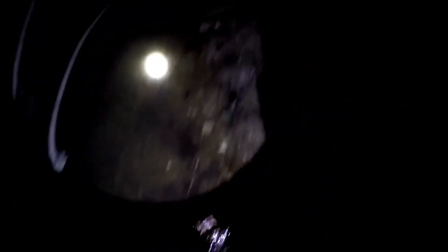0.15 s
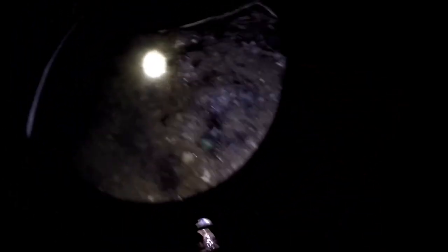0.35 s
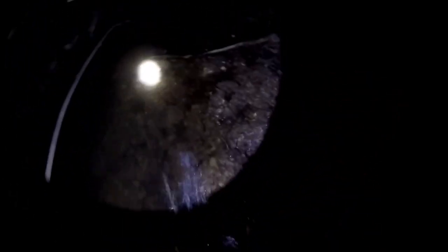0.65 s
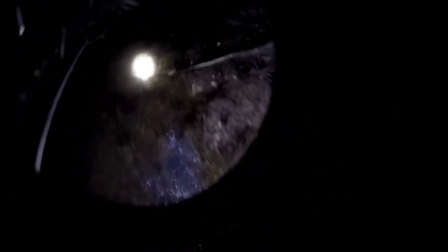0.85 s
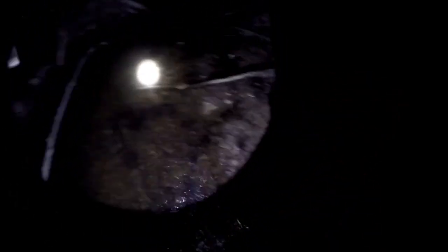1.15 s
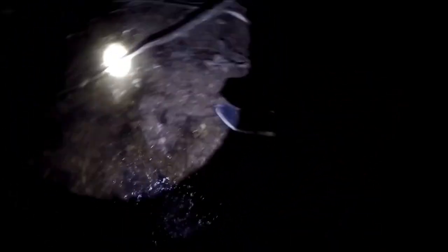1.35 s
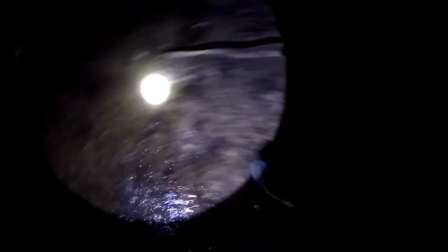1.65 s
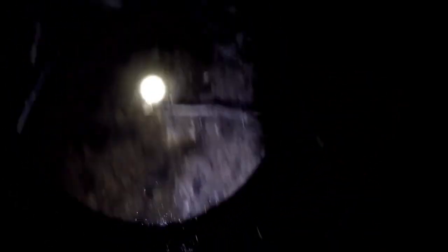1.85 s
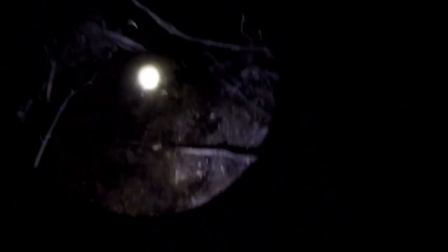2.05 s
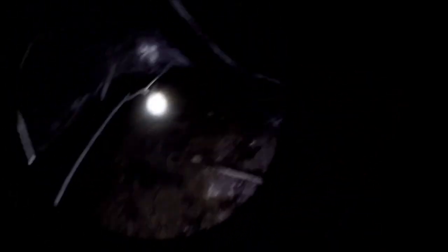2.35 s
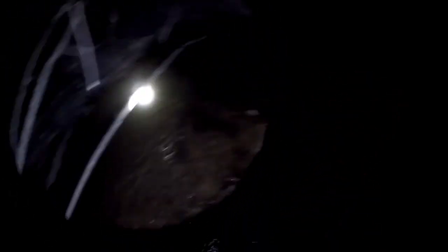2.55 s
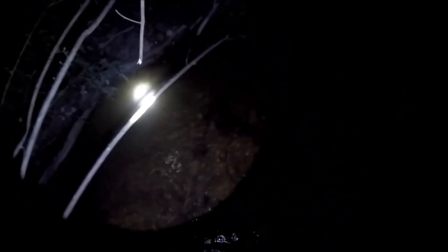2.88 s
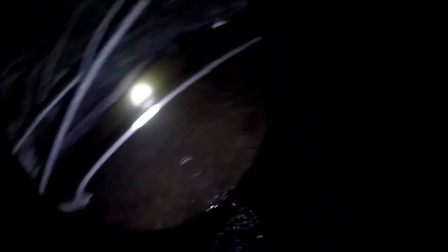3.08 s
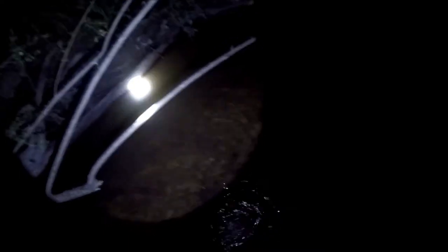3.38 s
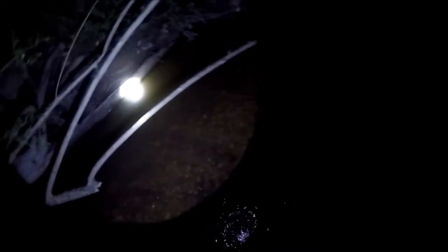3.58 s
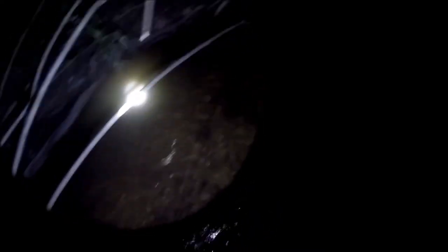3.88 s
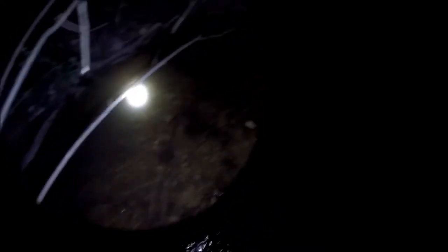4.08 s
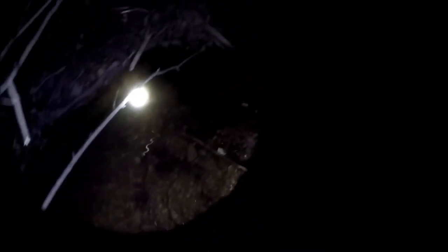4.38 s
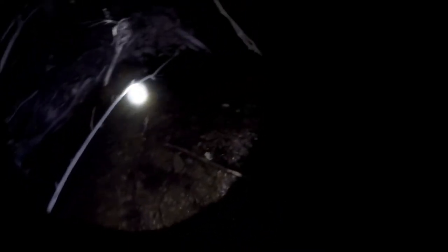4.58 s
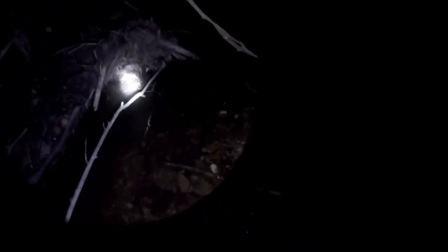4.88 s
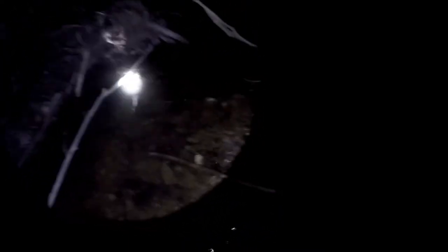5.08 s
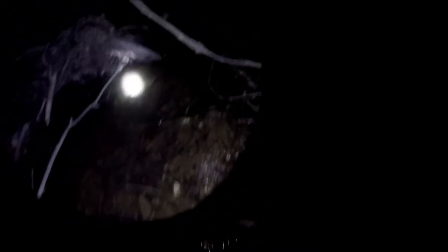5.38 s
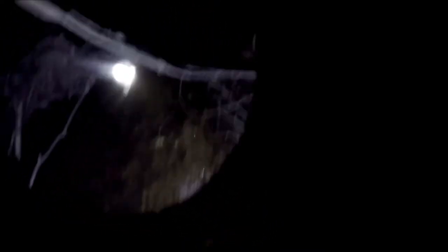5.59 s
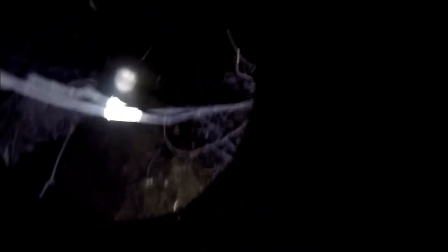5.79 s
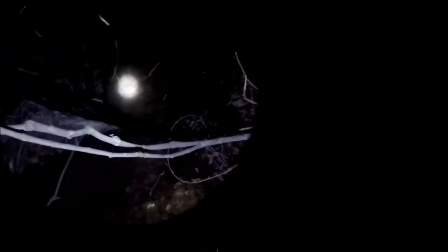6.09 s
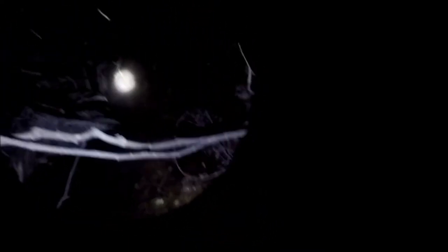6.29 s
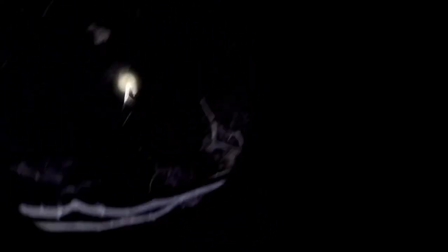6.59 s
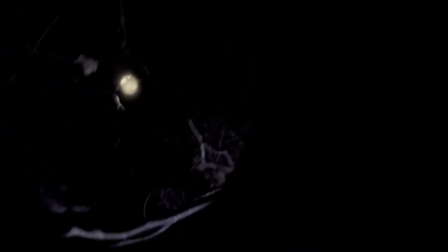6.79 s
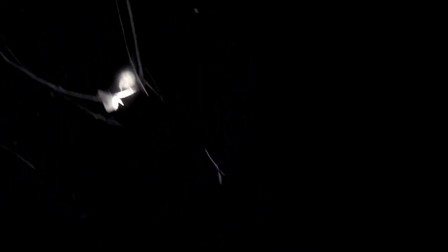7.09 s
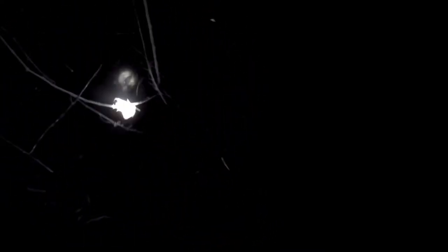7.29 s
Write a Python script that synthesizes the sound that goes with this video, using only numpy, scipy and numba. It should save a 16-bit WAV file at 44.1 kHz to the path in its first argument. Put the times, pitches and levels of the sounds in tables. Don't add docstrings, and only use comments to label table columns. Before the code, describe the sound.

Legs wade slowly through a shallow creek at night, dull splashes and glugs against a closed microphone housing while crickets trill steadily.

```python
import sys
import numpy as np
from scipy import signal
from scipy.fft import rfft, irfft, next_fast_len
from scipy.io import wavfile
from scipy.ndimage import uniform_filter1d, map_coordinates
from numba import njit

SR = 44100
rng = np.random.default_rng(int(sys.argv[2]) if len(sys.argv) > 2 else 0)


def decibels_to_gain(level_db):
    exponent = np.asarray(level_db, float) / 20
    return 10 ** exponent


def to_wav(s):
    ch = np.atleast_2d(s).T
    pcm = np.round(np.clip(ch, -1, 1) * 32767)
    wavfile.write(sys.argv[1], SR, pcm.astype(np.int16))


N = 328211


def level(x, db):
    return x * decibels_to_gain(db) / np.sqrt(np.mean(x ** 2))


def curve(table):
    s, *columns = np.transpose(table)
    return [np.interp(np.arange(N) / SR, s, c) for c in columns]


def ring(x, hz, width_hz):
    return signal.lfilter(*signal.iirpeak(hz, hz / width_hz, fs=SR), x)


def band_noise(hz, width_hz):
    return ring(ring(rng.standard_normal(N), hz, width_hz), hz, width_hz)


def coloured(points):
    size = next_fast_len(N)
    hz, db = np.transpose(points)
    log_hz = np.log(np.arange(size // 2 + 1) * SR / size + 1)
    gain = decibels_to_gain(np.interp(log_hz, np.log(hz), db, -90, -90))
    return level(irfft(rfft(rng.standard_normal(size)) * gain, size)[:N], 0)


def walk(rate_hz):
    k = int(SR / rate_hz)
    held = np.repeat(rng.standard_normal(1000), k)[:N]
    return 1.3 * uniform_filter1d(uniform_filter1d(held, k), k)


def even(x, span_s, slack):
    return level(x / (uniform_filter1d(np.abs(x), int(span_s * SR)) + slack), 0)


def swells(start_s, hold_s, db, rise_db_s, fall_db_s, floor_db=-120):
    t = np.arange(0, N / SR + .002, .001)
    since = t - np.reshape(start_s, (-1, 1))
    before_db = rise_db_s * np.maximum(-since, 0)
    after_db = fall_db_s * np.maximum(since - np.reshape(hold_s, (-1, 1)), 0)
    event_db = np.reshape(db, (-1, 1)) - (before_db + after_db)
    power = np.sum(decibels_to_gain(event_db) ** 2, axis=0) + decibels_to_gain(floor_db) ** 2
    return np.interp(np.arange(N) / SR, t, np.sqrt(power))


@njit
def grains(length, start, hz, t60, glide, size, swell):
    y = np.zeros(length)
    for k in range(len(start)):
        z, w, closed = size[k] + 0j, 2 * np.pi * hz[k] / SR, 1.
        fade, climb = np.exp(-np.log(1000) / (t60[k] * SR)), glide ** (1 / SR)
        opening = np.exp(-1 / (swell * t60[k] * SR))
        for i in range(start[k], min(length, start[k] + int(t60[k] * SR))):
            z *= fade * np.exp(1j * w)
            w *= climb
            closed *= opening
            y[i] += z.imag * (1 - closed)
    return y


def swarm(low_hz, high_hz, cycles, spread_db, glide, count):
    when, pitch, size = rng.random((count, 3)).T
    hz = low_hz * (high_hz / low_hz) ** pitch
    size = decibels_to_gain(-spread_db * np.log(size + 0.03)) * np.sqrt(hz)
    return level(grains(N, (when * N).astype(np.int64), hz, cycles / hz, glide, size, 0.031), 0)


def rings(rows, swell):
    s, db, hz, t60_s = np.transpose(rows)
    return grains(N, (s * SR).astype(np.int64), hz, t60_s, 4., decibels_to_gain(db), swell)


def housing(x, push, modes, leak_db):
    def shell(v):
        return sum(decibels_to_gain(db) * ring(v, hz, width_hz) for hz, width_hz, db in modes) + decibels_to_gain(leak_db) * v
    return shell(x * push) / np.std(shell(x))


# start_s, length_s, level_db, bright_minus_dull_db
SPLASHES = [(0.145, 0.011, -60.5, 11), (0.422, 0.09, -55, 3.5), (0.81, 0.049, -62, 19),
            (0.891, 0.093, -55, 5.5), (1.035, 0.043, -52, -2.5), (1.273, 0.041, -50.5, 4),
            (1.333, 0.05, -41, 3), (1.394, 0.028, -48, -6), (1.43, 0.13, -50.5, -1),
            (1.595, 0.033, -49.5, 0), (1.729, 0.033, -43.5, -2), (1.798, 0.048, -53, -4),
            (1.921, 0.029, -61.5, -11), (1.975, 0.056, -54.5, -3), (2.308, 0.017, -50, -0.5),
            (2.608, 0.0089, -49, -4), (2.852, 0.031, -51, -2.5), (3.075, 0.087, -46.5, -1.5),
            (3.322, 0.015, -51, -12.5), (3.606, 0.039, -46.5, 1), (3.782, 0.026, -48, -4),
            (3.819, 0.02, -48.5, -14), (3.867, 0.025, -59.5, -13), (3.96, 0.0068, -47, -6),
            (3.981, 0.032, -50, 3), (4.129, 0.014, -47, -8), (4.921, 0.06, -55.5, -2.5),
            (6.075, 0.043, -45.5, 1), (6.194, 0.044, -48, -4), (6.234, 0.027, -53, -7),
            (6.597, 0.05, -54.5, -4.5)]
# start_s, length_s, level_db
SLOSHES = [(0.63, 0.024, -54), (1.201, 0.023, -56), (1.65, 0.025, -54), (2.332, 0.057, -57),
           (2.498, 0.032, -59), (2.547, 0.044, -59), (2.669, 0.05, -59), (2.793, 0.021, -60.5),
           (2.947, .03, -63), (4.3, 0.11, -67), (5.212, 0.03, -65), (3.002, 0.031, -58.5),
           (3.242, 0.11, -60), (3.362, 0.034, -56), (3.41, 0.017, -53.5), (3.64, 0.053, -58),
           (3.747, 0.027, -51.5), (4.064, 0.062, -55.5), (4.768, .071, -64), (5.116, 0.034, -58.5),
           (5.502, 0.016, -58), (5.561, 0.06, -59), (5.671, 0.076, -60), (5.785, 0.025, -64),
           (4.69, 0.038, -67), (5.903, 0.038, -59.5), (5.974, 0.065, -58.5), (6.177, .025, -59),
           (6.368, 0.053, -59), (6.58, 0.025, -58), (6.662, 0.058, -59), (6.803, 0.089, -56.5),
           (6.91, 0.029, -58.5), (7.024, 0.12, -60.5), (7.363, 0.097, -62)]
SLOSH_TILT_DB = -2.5
# time_s, level_db
STIR = [(0.0, -65.5), (0.6, -57.5), (0.91, -59.5), (1.04, -63.5), (1.43, -55), (1.86, -58.5), (1.99, -63),
        (3.25, -62), (3.4, -68), (3.7, -54), (4.0, -66), (4.55, -67), (5.01, -61), (5.43, -64.5),
        (6.62, -60), (6.75, -68), (6.95, -58.5), (7.44, -67)]
# pitch_hz, width_hz, gain_db
DULL_MODES = [(695, 690, -7), (816, 130, -20), (1020, 520, -6.5)]
# pitch_hz, width_hz, gain_db
BRIGHT_MODES = [(1440, 420, -4.5), (1912, 160, -0.5), (2420, 87, -19), (2886, 300, -10.5)]
# freq_hz, density_db
THUMP = [(55, -27), (80, 5.5), (130, -3), (180, -15.5), (240, -25.5), (400, -37)]


def wading():
    t, dull, bright = np.arange(N) / SR, np.zeros(N), np.zeros(N)
    for s, length_s, db, tilt_db in SPLASHES + [row + (SLOSH_TILT_DB,) for row in SLOSHES]:
        span = slice(max(int((s - .02) * SR), 0), int((s + length_s + .12) * SR))
        since = t[span] - s
        onset = np.clip(since / 0.0077 + 0.31, 0, 1)
        shape = onset * np.exp(-np.maximum(since - length_s + 0.0033, 0) / 0.0068)
        dull[span] += (decibels_to_gain(db - tilt_db / 2) * shape) ** 2
        bright[span] += (decibels_to_gain(db + tilt_db / 2) * shape) ** 2
    flicker_db = 2.2 * walk(30)
    dull, bright = (v * decibels_to_gain(1.07 * walk(70)) ** 2 for v in (dull, bright))
    stir = decibels_to_gain(curve(STIR)[0] + flicker_db) ** 2
    low_bubbles = swarm(500, 1150, 11., 3.6, 30., count=14000)
    low = housing(low_bubbles, np.sqrt(dull + .6 * stir), DULL_MODES, leak_db=-17)
    high_bubbles = swarm(1100, 3000, 14., 3.8, 30., count=30000)
    high = housing(high_bubbles, np.sqrt(bright + .6 * stir), BRIGHT_MODES, leak_db=-15)
    knock = coloured(THUMP) * uniform_filter1d(np.sqrt(dull), int(0.021 * SR))
    spray = decibels_to_gain(-14.5) * np.sqrt(bright) * swarm(3100, 4600, 9.9, 3.6, 1., count=20000)
    return spray + decibels_to_gain(-3.0) * low + decibels_to_gain(-2.0) * high + decibels_to_gain(2.5) * knock


# start_s, peak_db, pitch_hz
GLUGS = [(1.061, -35.5, 790), (1.722, -40, 1020), (1.735, -34, 750), (1.91, -39.5, 530),
         (2.314, -32.5, 665), (2.599, -36, 1100), (3.086, -26, 745), (3.104, -25.5, 770),
         (3.146, -28.5, 767), (3.591, -45, 660), (3.981, -34, 900), (3.995, -28.5, 715), (4.135, -34, 1020),
         (4.935, -39, 1020), (6.06, -47, 750), (6.077, -31, 757), (6.087, -26.5, 810), (6.627, -33.5, 850),
         (6.774, -46, 800), (1.291, -45, 1012), (1.341, -35, 1050), (1.352, -31, 1000), (1.366, -30, 689),
         (1.513, -45, 882), (1.609, -40, 645), (1.744, -34, 710), (3.161, -36, 740), (3.616, -32, 689),
         (3.626, -39, 700), (3.637, -38, 660), (3.828, -36, 775), (4.947, -38, 1033), (6.098, -27, 1000),
         (6.235, -40, 796), (6.249, -32, 680)]
# start_s, peak_db, pitch_hz
PLINKS = [(1.0423, -35, 1440), (1.3444, -24.5, 1990), (1.603, -42, 1420), (1.7362, -33, 1980),
          (1.75, -40, 1400), (2.3584, -39, 1890), (3.0803, -44, 1900), (3.13, -29, 1490),
          (3.325, -42, 1310), (3.6056, -37, 1280), (3.9601, -48, 1500), (3.9801, -36, 1467),
          (3.996, -32, 1495), (4.086, -39, 1220), (6.076, -28.5, 1440), (6.2153, -31, 1230),
          (6.526, -44, 1320), (6.6263, -39.5, 1930), (1.667, -40, 1980), (.758, -40, 4200),
          (6.9882, -53, 1400), (.495, -38, 1450), (.853, -38, 3983), (.89, -44, 2810), (.905, -41, 3897),
          (.942, -39, 1970), (1.049, -37, 1940), (1.06, -40, 1850), (1.303, -42, 1356), (1.334, -41, 1370),
          (1.354, -45, 4608), (1.363, -32, 2720), (1.369, -44, 4565), (1.371, -37, 3360),
          (1.393, -42, 1470), (1.46, -34, 2010), (1.472, -37, 2810), (1.522, -41, 2024), (1.613, -36, 1981),
          (3.091, -35, 1860), (3.107, -35, 1860), (3.119, -32, 1444), (3.147, -36, 1530), (3.62, -38, 1920),
          (3.623, -38, 1510), (3.794, -39, 1270), (3.996, -37, 1800), (6.087, -33, 1510)]
GLUG_T60_S, PLINK_T60_S = 0.022, 0.031


def bubbles():
    glugs = [row + (GLUG_T60_S,) for row in GLUGS]
    plinks = [row + (PLINK_T60_S,) for row in PLINKS]
    return rings(glugs + plinks, swell=.07)


# start_s, peak_db, centre_hz
SMACKS = [(0.644, -42, 1100), (.879, -33, 1150), (.9, -37, 600), (0.913, -35, 550), (0.934, -42, 650),
          (.768, -44, 3000), (.846, -45, 3200), (.862, -44, 4500), (.905, -44, 3000), (.925, -45, 4000),
          (1.04, -38, 1300), (1.062, -38, 910), (1.342, -45, 3500), (1.35, -48, 4600), (1.41, -38, 900),
          (1.46, -44, 3000), (1.52, -38, 3600), (1.358, -48, 4200), (1.371, -43, 3600),
          (1.604, -31.5, 1200), (1.71, -34, 1250), (1.735, -39, 1300), (1.91, -37, 700), (1.998, -34, 910),
          (2.313, -35.5, 1100), (2.358, -36, 795), (2.573, -39.5, 800), (2.599, -33.5, 1010),
          (2.614, -37, 1900), (2.744, -46, 1700), (2.86, -42, 1500), (3.086, -40, 1100), (3.324, -42, 900),
          (3.38, -35, 1100), (3.418, -43, 800), (3.607, -33.5, 1400), (3.62, -39, 2400), (3.64, -42, 800),
          (3.751, -42, 1800), (3.788, -39, 800), (3.829, -31, 895), (3.96, -33, 1500), (3.98, -37, 1500),
          (4.085, -39, 1100), (4.135, -41, 1100), (4.935, -42, 1100), (5.138, -35.5, 1500),
          (5.755, -49, 6500), (5.856, -45, 900), (6.075, -36, 1200), (6.206, -36, 1010), (6.217, -36, 1390),
          (6.382, -37, 1100), (6.535, -48, 6500), (6.625, -36, 1300), (6.693, -43.5, 1700),
          (6.775, -47, 1000), (6.804, -42.5, 800), (6.988, -38.5, 1200), (7.045, -48, 2400)]
SMACK_RISE_DB_S, SMACK_FALL_DB_S, WIDTH_PER_HZ = 9000, 2500, 1.2


def smacks():
    out, t = np.zeros(N), np.arange(-64, 1024) / SR
    shape = decibels_to_gain(np.where(t < 0, SMACK_RISE_DB_S * t, -SMACK_FALL_DB_S * t))
    for (s, db, hz), noise in zip(SMACKS, rng.standard_normal((len(SMACKS), len(t)))):
        width_hz = WIDTH_PER_HZ * hz
        burst = ring(ring(shape * noise, hz, width_hz), hz, width_hz)
        burst *= decibels_to_gain(db - 6.5) / np.max(np.abs(burst))
        start = int(s * SR) - 64
        out[start:start + len(t)] += burst
    return out


# start_s, hold_s, level_db
WHISTLE = [(0.24, .02, -54), (0.395, 0.025, -49), (0.646, 0.032, -58), (0.925, 0.04, -52),
           (1.218, .015, -52), (1.278, .03, -54), (1.34, .01, -43), (1.45, 0.058, -51), (1.736, 0.076, -62),
           (1.956, 0.014, -53), (2.56, 0.05, -61), (2.678, 0.028, -58.5), (2.79, 0.049, -57.5),
           (3.79, .02, -60), (2.997, 0.018, -52), (4.383, 0.017, -58.5), (4.82, 0.023, -55),
           (4.918, 0.031, -55.5), (5.027, 0.024, -55), (5.13, 0.14, -57), (5.507, 0.11, -56.5),
           (6.07, 0.027, -60), (6.223, .02, -51), (6.38, 0.016, -52), (6.82, 0.088, -57),
           (7.07, 0.048, -51), (7.41, .02, -55)]
WHISTLE_RISE_DB_S, WHISTLE_FALL_DB_S = 266, 237


def whistle():
    band = band_noise(1960, 170)
    flutter_db = 2.2 * walk(22)
    drift = .016 * np.cumsum(flutter_db[::-1])
    band = map_coordinates(band, [np.arange(N) + drift], order=1, mode="mirror")
    gain = swells(*np.transpose(WHISTLE), WHISTLE_RISE_DB_S, WHISTLE_FALL_DB_S, -89)
    return level(band, -7.5) * decibels_to_gain(flutter_db) * gain


# start_s, peak_db, pitch_hz, t60_s
DROPS = [(0.498, -35.5, 4260, 0.06), (0.502, -37.5, 6600, 0.013), (0.532, -37, 3770, .02),
         (0.661, -38, 3880, 0.016), (.7495, -37.5, 2380, 0.03), (.759, -42, 1454, 0.068),
         (0.788, -40.5, 2530, 0.044), (.802, -42, 2390, .03), (0.81, -37, 4130, 0.02),
         (0.8195, -33, 3300, 0.0065), (0.8208, -27.5, 4000, 0.011), (.821, -40, 6160, .011),
         (.838, -41.5, 1344, 0.1), (0.8782, -42, 2330, .02), (.884, -41, 8500, 0.0081),
         (.889, -33.5, 3640, 0.017), (.89, -40, 8100, 0.007), (1.345, -28.5, 2870, 0.017),
         (1.447, -45, 6660, 0.0099), (.714, -51, 6400, .015), (.757, -51, 6600, .012),
         (5.135, -46, 2250, .008), (7.04, -52, 2300, .015), (.8545, -47, 13400, .004),
         (1.338, -60, 11300, .016), (1.3458, -53, 11900, .014), (1.36, -56, 11400, .018),
         (3.7489, -53, 11000, .004)]


def drops():
    return rings(DROPS, swell=.012)


# start_s, hold_s, level_db, body_over_level_db
GRASS = [(0.402, .09, -63, 6), (0.498, 0.0065, -44.5, -1), (0.6, 0.063, -57, -11), (0.706, 0.023, -55, -7),
         (0.754, 0.061, -56.5, -2), (0.797, 0.038, -51.5, 3), (0.835, 0.036, -55.5, 4),
         (0.88, 0.034, -55.5, 7.5), (0.94, 0.045, -62.5, 4), (1.342, 0.023, -59.5, 16.5),
         (1.445, 0.028, -57.5, 9), (1.491, 0.059, -56, 6), (1.576, .1, -66, 7)]
GRASS_RISE_DB_S, GRASS_FALL_DB_S = 900, 394


def grass():
    s, hold_s, db, body_db = np.transpose(GRASS)
    crackle = swarm(4000, 7100, 3.9, 3.6, 1., count=20000)
    scratch = swarm(1980, 4750, 20.0, 4.2, 1., count=14000)
    fine = swells(s, hold_s, db - 3, GRASS_RISE_DB_S, GRASS_FALL_DB_S)
    body = swells(s, hold_s, db + body_db - 3, GRASS_RISE_DB_S, GRASS_FALL_DB_S)
    return fine * crackle + body * scratch


# start_s, peak_db, pitch_hz, t60_s
KNOCKS = [
    (1.352, -24, 131, 0.092),
    (3.796, -29, 103.4, 0.18),
    (6.097, -33.5, 132, 0.19),
]
# start_s, peak_db, pitch_hz, t60_s
BUMPS = [(.7, -51, 295, .06), (.4, -31.5, 148, 0.062), (1.12, -39, 159, 0.072), (1.23, -42, 147, 0.12),
         (1.66, -49, 270, 0.039), (1.83, -37, 200, .07), (2.25, -37, 120, .08), (3.7, -43, 130, .08),
         (4.37, -39, 121, 0.073), (4.85, -47, 110, .1), (5.27, -43, 167, 0.081), (6.7, -48, 249, 0.069),
         (6.76, -49, 169, .07), (1.37, -42, 277, 0.036), (1.6, -42, 331, 0.042), (1.92, -48, 220, .05),
         (2.68, -42, 170, 0.087), (3.41, -37, 149, 0.066), (3.62, -48.5, 300, 0.054),
         (5.14, -45, 199, 0.068), (5.5, -50, 147, .08), (6.1, -59, 230, 0.072), (6.31, -50, 240, 0.04),
         (6.49, -46, 170, 0.067), (6.6, -46, 326, .05), (7.38, -52, 230, .06)]


def knocks():
    return rings(KNOCKS, swell=.012) + rings(BUMPS, swell=.1)


# start_s, hold_s, level_db
SURGES = [(0.1, 0.11, -41), (0.403, 0.069, -30), (0.705, 0.015, -24.5), (0.812, 0.037, -30.5),
          (0.998, 0.048, -35), (1.288, 0.078, -30), (1.438, 0.1, -29), (1.672, 0.011, -27.5),
          (1.792, 0.083, -27.5), (1.99, 0.099, -35), (2.319, 0.036, -28.5), (2.577, 0.089, -31.5),
          (2.805, 0.021, -29.5), (3.017, 0.018, -27), (3.126, 0.17, -30.5), (3.453, 0.25, -33),
          (3.747, 0.052, -29), (3.895, 0.16, -31.5), (4.234, 0.35, -37), (4.718, 0.1, -33),
          (5.095, 0.036, -34), (5.37, 0.17, -40), (5.763, 0.12, -39), (5.945, 0.3, -38), (6.1, .03, -32.5),
          (6.33, 0.077, -30.5), (6.59, 0.01, -22.5), (6.712, 0.24, -31.5), (7.158, 0.091, -33),
          (7.38, 0.049, -30.5)]
SURGE_RISE_DB_S, SURGE_FALL_DB_S, BREEZE_DB = 197, 257, -37
# freq_hz, density_db
DEEP = [(9, -6), (14, -10), (26, -1.5), (38, 5), (50, -7), (62, -10.5), (90, -23)]
# start_s, level_db
THUMPS = [(.14, -38), (.45, -38.5), (.55, -40.5), (.7, -48), (.81, -42), (1.0, -42.5), (1.47, -34.5),
          (1.6, -41.5), (1.77, -37), (1.85, -40), (1.93, -37.5), (2.07, -39.5), (2.35, -46), (2.57, -44.5),
          (3.0, -42), (3.25, -41), (3.58, -43), (4.1, -40.5), (4.7, -47.5), (4.8, -50), (5.14, -47),
          (5.52, -37.5), (6.3, -37), (6.6, -44), (5.85, -47), (.3, -48), (1.2, -46.5), (1.35, -47),
          (2.2, -47.5), (2.72, -49), (2.85, -48), (3.12, -55), (3.42, -44), (3.8, -41), (3.95, -52),
          (4.3, -61), (4.45, -57), (4.95, -53), (5.3, -55), (5.68, -46.5), (6.0, -60), (6.12, -50),
          (6.45, -50), (6.8, -44), (6.93, -46), (7.07, -44.5), (7.17, -60), (7.4, -42)]
THUMP_RISE_DB_S, THUMP_FALL_DB_S, GRIP_DB = 263, 219, -52.5


def buffeting():
    surge = swells(*np.transpose(SURGES), SURGE_RISE_DB_S, SURGE_FALL_DB_S, BREEZE_DB)
    s, db = np.transpose(THUMPS)
    thump = swells(s, 0, db, THUMP_RISE_DB_S, THUMP_FALL_DB_S, GRIP_DB)
    return surge * even(coloured(DEEP), 0.0505, 0.2) + thump * even(coloured(THUMP), 0.09, 0.61)


def trill(hz, rate_hz, phase, fall_hz):
    wander = .3 * walk(5)
    cycle = (np.arange(N) / SR * rate_hz + phase + wander) % 1
    stroke = np.sin(np.pi * np.clip(cycle / 0.61, 0, 1)) ** 2
    return stroke * np.sin(2 * np.pi * np.cumsum(hz - fall_hz * (cycle - .3)) / SR)


# start_s, level_db, pitch_hz
PHRASES = [(.1, -62, 3400), (2.36, -63, 3400), (2.67, -58.5, 3380), (3.05, -60, 3300), (3.36, -59, 3260),
           (3.7, -59, 3300), (4.06, -57, 3380), (4.4, -64, 3400), (4.95, -63, 3540), (5.16, -58.5, 3400),
           (5.5, -57, 3420), (6.45, -59, 3520), (6.92, -57, 3500), (7.3, -66, 3400)]
PHRASE_RISE_DB_S, PHRASE_FALL_DB_S, BETWEEN_DB = 77, 200, -71


def phrasing():
    s, db, _ = np.transpose(PHRASES)
    return swells(s, 0, db, PHRASE_RISE_DB_S, PHRASE_FALL_DB_S, BETWEEN_DB)


def nearest_cricket():
    return phrasing() * level(trill(curve(PHRASES)[1], 40.5, .35, fall_hz=638.0), -0.16)


# time_s, level_db
CRICKETS = [
    (0.0, -58),
    (0.8, -57.5),
    (1.1, -60),
    (2.05, -58),
    (2.5, -61.5),
    (4.4, -58),
    (4.78, -59),
    (5.7, -58.5),
    (7.44, -57.5),
]
ANSWER_DB = -2


def chorus(count=6):
    gain = np.hypot(decibels_to_gain(curve(CRICKETS)[0]), decibels_to_gain(ANSWER_DB) * phrasing())
    near = np.zeros(N)
    for pitch, (rate, phase) in zip(np.linspace(-.5, .5, count), rng.random((count, 2))):
        turn = decibels_to_gain(9.3 * walk(2.69))
        near += turn * trill(3560 + 260 * pitch, 37 + 6 * rate, phase, fall_hz=406.2)
    wash = rng.standard_normal(2048) * np.exp(-np.arange(2048) / (0.0073 * SR))
    near = level(near, -7.0) + level(signal.fftconvolve(near, wash)[:N], -9.0)
    haze = band_noise(3547, 400)
    return gain * (level(near, -6.0) + level(haze, 0))


# pitch_hz, width_hz, level_db
FAR_CHORUS = [(4362, 170, -71), (4904, 830, -62.5)]


def far_chorus():
    return sum(level(band_noise(hz, width_hz), db) * decibels_to_gain(1.06 * walk(5.6))
               for hz, width_hz, db in FAR_CHORUS)


# freq_hz, density_db
HISS = [(120, -39), (200, -3.5), (344, -4), (1600, -17), (3500, -11), (4930, -9.5), (5910, -17),
        (15200, -24)]
HISS_DB = -65


def hiss():
    return decibels_to_gain(HISS_DB + 0.84 * walk(29)) * coloured(HISS)


def scene():
    background = hiss()
    water = wading() + whistle() + bubbles() + drops()
    handling = grass() + knocks() + buffeting()
    insects = chorus() + nearest_cricket() + far_chorus()
    return (water + handling + insects + smacks() + background)[None]


def top_cut(x):
    return signal.sosfilt(signal.butter(12, 15310, fs=SR, output="sos"), x)


def record(dry):
    low_pass = signal.ellip(12, .3, 70, 15300, fs=SR, output="sos")
    mix = signal.sosfilt(low_pass, dry)
    return top_cut(mix)


dry = scene()
out = record(dry)
to_wav(out)
```